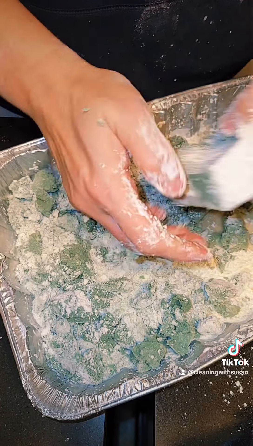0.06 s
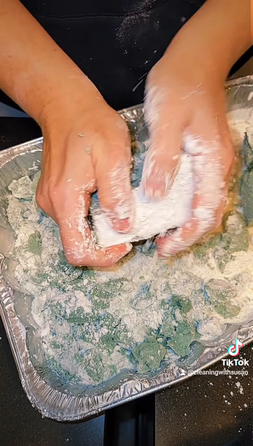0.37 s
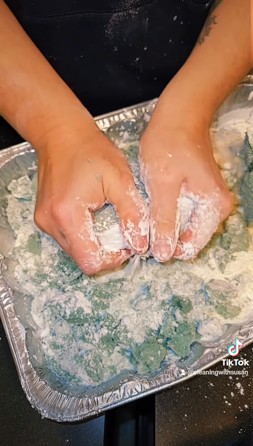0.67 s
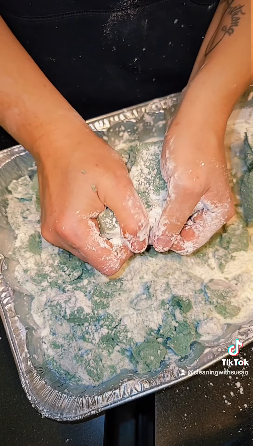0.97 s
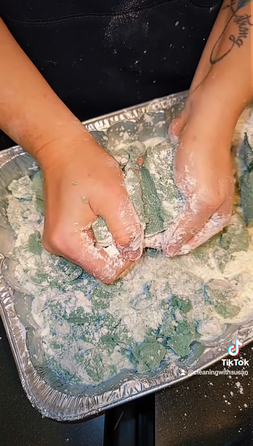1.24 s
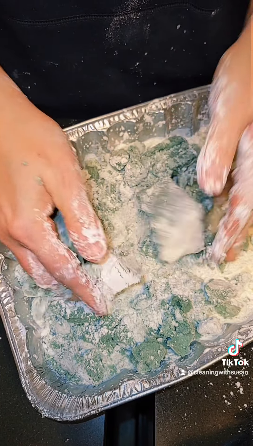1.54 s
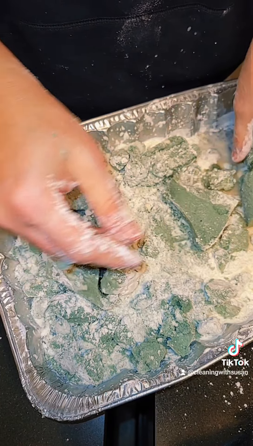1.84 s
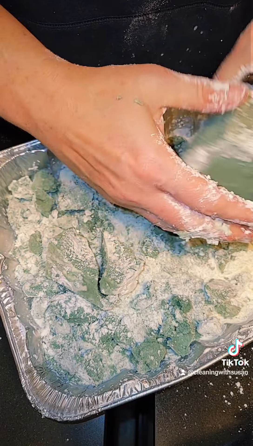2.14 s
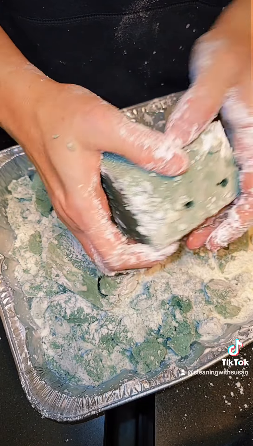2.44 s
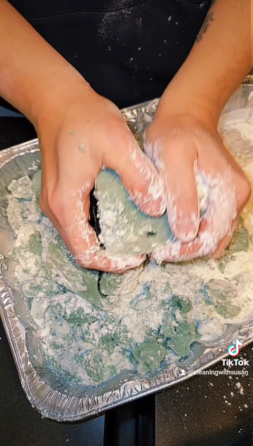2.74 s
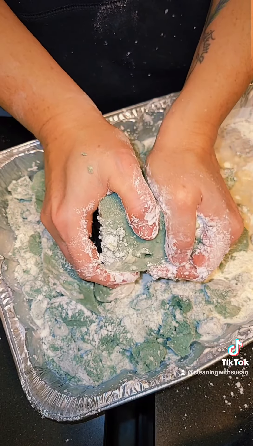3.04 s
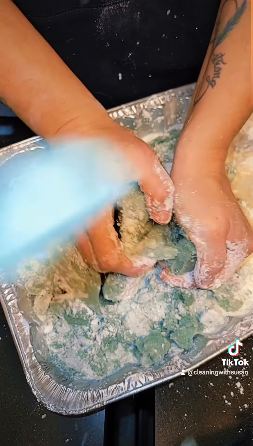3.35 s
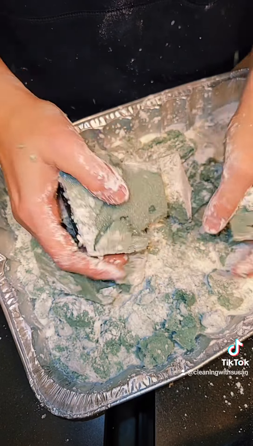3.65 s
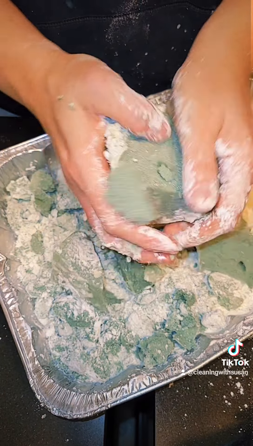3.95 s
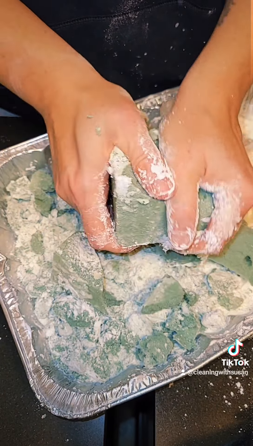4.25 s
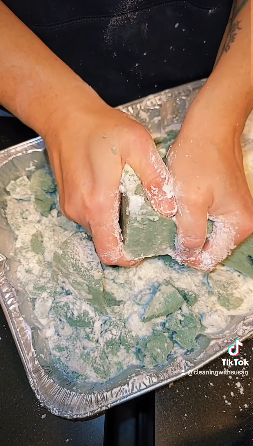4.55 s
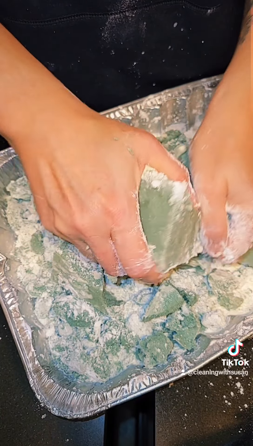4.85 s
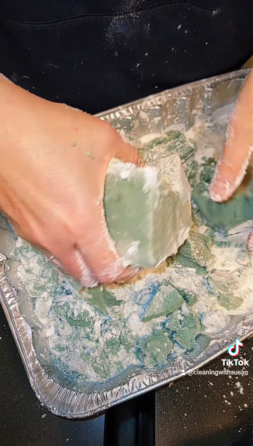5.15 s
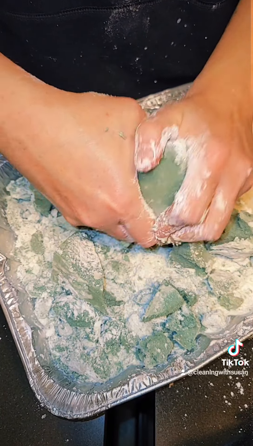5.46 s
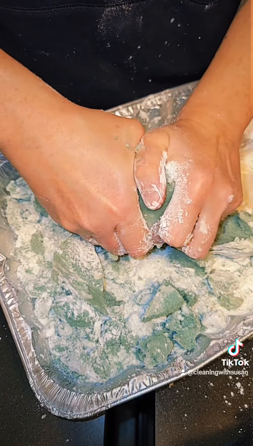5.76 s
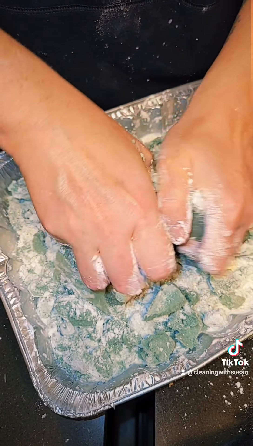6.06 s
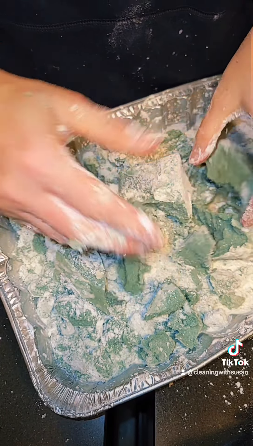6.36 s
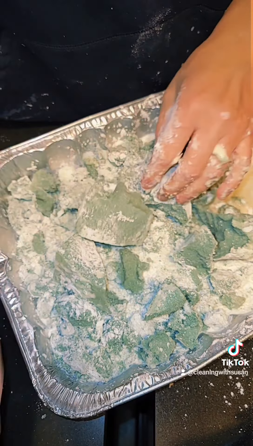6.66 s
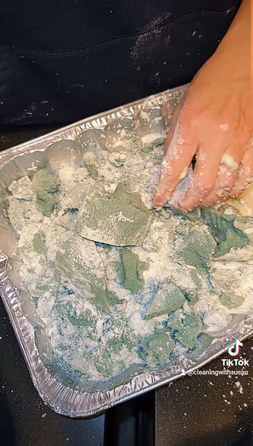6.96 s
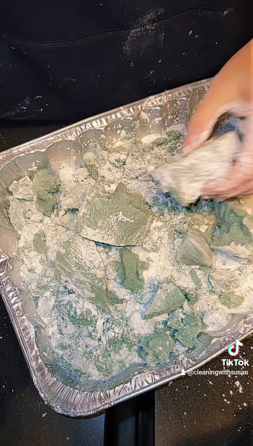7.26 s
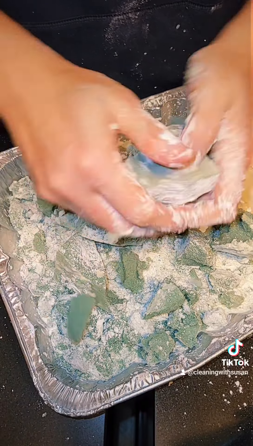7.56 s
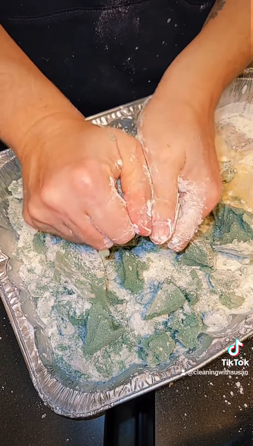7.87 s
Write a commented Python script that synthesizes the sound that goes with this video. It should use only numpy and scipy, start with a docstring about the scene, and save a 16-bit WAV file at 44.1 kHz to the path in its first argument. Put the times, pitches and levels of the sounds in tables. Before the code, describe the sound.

Fingers rub dry floral foam and bump a foil tray with a dull thud. Two hands then crush the blocks in a series of crisp, crackling squeezes, the foam juddering, snapping and collapsing while powder hisses between the fingers. Between squeezes there is softer rubbing, and crumbs tick on the foil. The microphone is close, in a small room with a faint low rumble.

```python
"""Fingers rub dry floral foam and bump a foil tray over the low rumble of a small room.
Two hands then crush the blocks, close by. Each squeeze collapses thousands of brittle cells:
the foam judders, snaps and breaks in an avalanche of fractures. Powder hisses between the fingers,
brief pitched resonances sound in the crunch, and crumbs tick on the foil."""
import sys
import numpy as np
from scipy import signal
from scipy.fft import rfft, irfft, next_fast_len
from scipy.io import wavfile
from scipy.ndimage import map_coordinates

SR = 44100
rng = np.random.default_rng(int(sys.argv[2]) if len(sys.argv) > 2 else 0)


def unload_wav(signal):
    """Save mono or channel-first audio to the path in sys.argv[1] as 16-bit WAV at rate SR, clipped to [-1, 1]."""
    wavfile.write(
        sys.argv[1],
        SR,
        np.round(np.clip(np.atleast_2d(signal).T, -1, 1) * 32767).astype(np.int16),
    )


N = 353682

# Blocks or lumps giving way: start_s, level_db, rise_s, t60_s, powder_share
BLOCK_BREAKS = [(0.611, -3, 0.003, 0.46, 0.3), (1.154, -1.5, 0.0005, 0.32, 0.2),
                (1.279, -17.5, 0.00053, 0.25, 1), (3.188, 7.5, 0.011, 0.31, 0),
                (4.634, 4, 0.00093, 0.39, 0.12), (5.896, 0.5, 0.00049, 0.28, 0.01),
                (6.357, -12, 0.003, 0.16, 0.78), (6.435, -27, 0.003, 0.43, 0.6),
                (6.897, -10.5, 0.0017, 0.43, 1), (7.912, 2.5, 0.0036, 0.31, 0)]
# Crust cracks: start_s, level_db, pitch_hz
CRUST_SNAPS = [(0.7227, -1, 4580), (0.7293, -4.5, 7770), (3.046, -2.5, 2800), (3.1053, -8, 7900),
               (3.161, 1.5, 7450), (4.2341, -9, 3460), (4.4782, -6, 4650), (4.495, 1, 4780),
               (4.5013, -1.5, 3630), (4.5094, 0.5, 5890), (4.5382, -2, 5850), (4.559, -1, 4500),
               (4.6064, -6.5, 3270), (5.4446, -6, 8220), (5.4646, -3.5, 4320), (5.5452, 3, 7350),
               (5.708, -3.5, 6130), (5.773, -2, 4970), (5.806, -3.5, 7400), (5.8732, -1.5, 3370),
               (7.785, 1, 7430)]
# Fine powder: freq_hz, gain_db
POWDER_SPECTRUM = [(800, -28.5), (2700, -34), (4200, -10.5), (6000, -5.5), (7700, -1), (9500, -5),
                   (11000, -2), (12700, 1), (15500, -2)]
# Hands over the tray: time_s, position (0 middle, 1 right edge)
HAND_PATH = [(0, 0.72), (.4, 0.051), (6.2, 0), (6.6, 0.85), (7.3, 1), (7.65, 0)]


def amp(db):
    """Decibels to gain."""
    return 10 ** (np.asarray(db) / 20)


def unit(x):
    """Scale to rms 1."""
    return x / np.sqrt(np.mean(x ** 2) + 1e-20)


def pan(left_over_right_db):
    """Left and right gains."""
    return amp(np.array([[1], [-1]]) * left_over_right_db / 2)


def along(points, hz):
    """Interpolate (freq_hz, value) rows on a log axis."""
    freq_hz, values = np.transpose(points)
    return np.interp(np.log(hz + 1), np.log(freq_hz + 1), values)


def curve(points):
    """Interpolate (time_s, value) rows per sample."""
    return np.interp(np.arange(N) / SR, *np.transpose(points))


def wobble(rate_hz):
    """Smooth random curve."""
    knots = rng.standard_normal(int(N * rate_hz / SR) + 4)
    return map_coordinates(knots, [np.arange(N) * rate_hz / SR], order=2)


def filtered(x, response):
    """Apply response(hz) by FFT."""
    size = next_fast_len(x.shape[-1] + SR // 8)
    return irfft(rfft(x, size) * response(np.fft.rfftfreq(size, 1 / SR)), size)[..., :x.shape[-1]]


def colour(x, spectrum, size=4096):
    """Minimum-phase filter; attacks stay sharp."""
    cepstrum = irfft(np.log(amp(along(spectrum, np.fft.rfftfreq(size, 1 / SR)))))
    cepstrum[1:size // 2] *= 2
    cepstrum[size // 2 + 1:] = 0
    impulse = irfft(np.exp(rfft(cepstrum)))
    return signal.fftconvolve(x, impulse[None] / np.linalg.norm(impulse), axes=1)[:, :x.shape[1]]


def resonance(x, hz, q):
    """One damped mode."""
    return filtered(x, lambda f: 1j * f * hz / q / (hz * hz - f * f + 1j * f * hz / q))


def noise(size=N):
    """White stereo noise, alike in the bass only."""
    # Left-right likeness: freq_hz, correlation
    likeness = [(30, 0.67), (60, 0.81), (130, 1), (290, 0.8), (640, 0), (1400, 0.07), (4000, 0), (12000, 0)]

    def mid_side_gains(hz):
        angle_rad = np.arccos(np.clip(along(likeness, hz), -1, 1)) / 2
        return np.array([np.cos(angle_rad), np.sin(angle_rad)])

    mid, side = filtered(rng.standard_normal((2, size)), mid_side_gains)
    return np.array([mid + side, mid - side])


def add(track, start_s, sound):
    """Mix in place."""
    part = track[:, max(round(start_s * SR), 0):][:, :sound.shape[1]]
    part += sound[:, :part.shape[1]]


def grains(rate_hz, spread_db, clump_db):
    """Tiny uneven fractures in clumps; position sets each one's left-right delay."""
    fires = rng.random(N) < rate_hz / SR
    size_db = spread_db * np.clip(rng.standard_normal(N), -2, 2) + clump_db * wobble(260)
    left = fires * amp(size_db) * rng.choice([-1, 1], N)
    delay_samples = np.round(3 - 23 * curve(HAND_PATH) + 8 * rng.laplace(size=N)).astype(int)
    right = np.bincount(np.clip(np.arange(N) + delay_samples, 0, N - 1), left, N)
    return np.array([left, right])


def hollows(x, depth_db, width_hz, life_s):
    """Shifting gaps between fingers and foam resonate: random spectral peaks and dips."""
    spectra = signal.stft(x, nperseg=1024)[2]
    bins, frames = np.indices(spectra.shape[1:])
    knots = rng.standard_normal((512, 700))
    grid = [bins * SR / 1024 / width_hz, frames * 512 / SR / life_s]
    gain_db = depth_db * map_coordinates(knots, grid, order=1, mode="mirror")
    return unit(signal.istft(spectra * amp(gain_db), nperseg=1024)[1][:, :N])


def background():
    """Low rumble and soft room air swell and sink together."""
    # Rumble envelope: time_s, level_db
    swell = [(0.0, -27), (0.06, -39), (0.11, -36), (0.29, -39.5), (0.64, -36.5), (0.67, -42), (1.83, -42),
             (2.48, -31.5), (3.06, -31), (3.24, -41), (4.38, -38), (4.49, -31.5), (4.53, -47),
             (5.52, -35.5), (5.58, -46), (7.75, -30.5), (7.95, -44), (8.02, -34.5)]
    # Room rumble: freq_hz, gain_db
    rumble_spectrum = [(20, -24.5), (32, -12.5), (48, 1.5), (70, 0.5), (90, -3.5), (117, 2), (150, -5.5),
                       (210, -10), (290, -20), (420, -29.5), (900, -44)]
    # Room air: freq_hz, gain_db
    air_spectrum = [(100, -8), (350, -6), (550, 0.5), (800, 1.5), (1200, -9.5), (2500, -35), (5000, -14.5),
                    (15500, -36)]
    rumble = unit(colour(noise(), rumble_spectrum))
    air = unit(colour(noise(), air_spectrum))
    return amp(curve(swell)) * (rumble + amp(-14) * air)


def stroke(full_s, hold_s, rise_db_per_s, fall_db_per_s):
    """Gain of one hand movement: build up, hold, die away."""
    t = np.arange(N) / SR - full_s
    gain_db = rise_db_per_s * np.minimum(t, 0) - fall_db_per_s * np.maximum(t - hold_s, 0)
    return amp(np.maximum(gain_db, -120))


def handling(trickle_db=-59):
    """Gains of cells, powder and tearing: hand movements summed in power over a steady trickle."""
    # Fingers rub or turn a piece: full_s, hold_s, level_db, tearing_offset_db
    rubs = [(0.0, 0.16, -49.5, 1.5), (0.254, 0.12, -42, -1.5), (0.41, 0.22, -45.5, 3.5),
            (1.321, 0.015, -34, -12), (1.412, 0.03, -40, -16), (1.522, 0.051, -51.5, -13),
            (1.902, 0.11, -64, 10), (1.968, 0.16, -58, -0.5), (2.27, 0.058, -53, -6),
            (2.333, 0.035, -41.5, -6.5), (2.4, 0.18, -45.5, -6), (2.465, 0.038, -35.5, -2),
            (3.42, 0.063, -34.5, -8.5), (3.553, 0.29, -50, -8), (3.683, 0.023, -53, 9),
            (3.968, 0.028, -47, -8), (4.041, 0.058, -44, -4.5), (4.947, 0.12, -46.5, -8),
            (5.13, 0.17, -47.5, -10), (5.3, 0.075, -41.5, -27), (5.98, 0.046, -43.5, -2),
            (6.091, 0.082, -34, -14), (6.239, 0.053, -49.5, -19), (6.444, 0.012, -44.5, -3.5),
            (6.82, 0.07, -54.5, -10), (7.33, 0.17, -58.5, 0.5), (7.61, 0.006, -40, -4.5)]
    # Hands bear down: full_s, hold_s, rise_db_per_s, level_db, powder_offset_db, tearing_offset_db
    squeezes = [(0.62, 0.2, 113, -26.5, -1, -26), (0.954, 0.23, 66, -33, 5, -14),
                (2.777, 0.064, 114, -24.5, 3, -13), (2.893, 0.38, 143, -25.5, 1.5, -10),
                (4.234, 0.12, 280, -28, -2.5, -11), (4.387, 0.041, 172, -26.5, 0, -10),
                (4.495, 0.21, 199, -27.5, -0.5, -13), (4.797, 0.067, 145, -25.5, -1, -11.5),
                (5.45, 0.2, 229, -26.5, -1, -14.5), (5.754, 0.17, 139, -26, -3.5, -21.5),
                (6.915, 0.1, 900, -36.5, 9.5, -9.5), (7.047, 0.13, 380, -29.5, 7.5, -15),
                (7.761, 0.046, 163, -25, -4, -17), (7.883, 0.065, 220, -27.5, 5, -11.5)]
    # Thumbs tear in: full_s, hold_s, rise_db_per_s, level_db
    tears = [(0.637, 0.06, 150.5, -38.5), (2.664, 0.016, 380, -22), (3.226, 0.12, 302, -33),
             (4.162, 0.051, 1100, -27), (4.624, 0.022, 900, -30), (5.558, 0.11, 90, -37.5)]
    cells, powder, tearing = np.zeros(N), np.full(N, amp(trickle_db) ** 2), np.zeros(N)
    for *timing, level_db, tearing_db in rubs:
        rub = amp(level_db) * stroke(*timing, rise_db_per_s=454, fall_db_per_s=257)
        cells += rub ** 2
        powder += (amp(0.5) * rub) ** 2
        tearing += (amp(tearing_db) * rub) ** 2
    for *timing, level_db, powder_db, tearing_db in squeezes:
        press = amp(level_db) * stroke(*timing, fall_db_per_s=158)
        cells += press ** 2
        powder += (amp(level_db + powder_db) * stroke(*timing, fall_db_per_s=226)) ** 2
        tearing += (amp(tearing_db) * press) ** 2
    for *timing, level_db in tears:
        tear = amp(level_db) * stroke(*timing, fall_db_per_s=281)
        cells += (amp(-2) * tear) ** 2
        tearing += tear ** 2
    return np.sqrt([cells, powder, tearing])


def stalls():
    """Gain dips: the foam holds still for 25 ms before it cracks, slips or suddenly gives way."""
    gain_db = np.zeros((1, N))
    dip = np.linspace(0, 1, SR // 40)[None] ** 0.5
    lead_s = dip.size / SR
    for start_s, _, rise_s, *_ in BLOCK_BREAKS:
        add(gain_db, start_s - lead_s, -6 * dip * np.exp(-rise_s / 0.0044))
    for start_s, *_ in [*CRUST_SNAPS, *jerks()]:
        add(gain_db, start_s - lead_s, -2.2 * dip)
    return amp(gain_db)


def crunch():
    """Cells collapse, powder slides and coarser pieces tear as the foam yields unevenly."""
    # Collapsing cells: freq_hz, gain_db
    cell_spectrum = [(200, -24.5), (700, -24.5), (1400, -11), (2100, -5), (3200, 0), (4600, 0.5),
                     (6000, -3), (7600, -3), (9500, -10.5), (15500, -16.5)]
    # Coarse tearing: freq_hz, gain_db
    tear_spectrum = [(120, -26), (300, -9.5), (500, -8.5), (680, -1.5), (830, -5.5), (980, -2),
                     (1200, -5.5), (1700, -4), (2300, -7.5), (4000, -20), (10000, -46.5)]
    cell_gain, powder_gain, tearing_gain = handling()
    cells = colour(grains(rate_hz=8000, spread_db=5, clump_db=1), cell_spectrum)
    cells = cell_gain * hollows(cells, depth_db=3, width_hz=215.7, life_s=0.07)
    powder = colour(grains(rate_hz=14000, spread_db=6, clump_db=1.2), POWDER_SPECTRUM)
    powder = powder_gain * hollows(powder, depth_db=3, width_hz=350, life_s=0.08)
    tearing = colour(grains(rate_hz=2500, spread_db=5, clump_db=2), tear_spectrum)
    tearing = tearing_gain * hollows(tearing, depth_db=4.5, width_hz=119.6, life_s=0.08)
    grip_db = 1.2 * wobble(45)
    return (amp(2.5) * cells + amp(5) * powder + amp(1.5) * tearing) * amp(grip_db) * stalls()


def bumps(t60_s=0.22):
    """The powder-filled tray answers a hand with a dull thud."""
    # Hand on tray: start_s, level_db, left_over_right_db
    knocks = [(0.009, -20, -16.5), (0.087, -11, -6.5), (0.111, -16.5, -11), (6.445, -20.5, 4),
              (7.608, -23, 10)]
    # Tray body: freq_hz, gain_db
    tray_spectrum = [(20, -9.5), (35, -3.5), (55, 4), (110, -0.5), (200, -15), (330, -18.5), (600, -31),
                     (2000, -46.5)]
    out, t = np.zeros((2, N)), np.arange(SR // 3) / SR
    for start_s, level_db, pan_db in knocks:
        thud = colour(noise(len(t)) * amp(-60 * t / t60_s), tray_spectrum)
        add(out, start_s, amp(level_db - 2.5) * pan(pan_db) * thud / np.abs(thud).max())
    return out


def specks():
    """Stray specks keep dropping from the fingers."""
    return amp(-61) * unit(colour(grains(rate_hz=16, spread_db=3, clump_db=1), POWDER_SPECTRUM))


def breaks(rush_t60_s=0.042):
    """A first rush of fractures, then a dying avalanche; caked powder sounds finer."""
    # Coarse avalanche: freq_hz, gain_db
    avalanche_spectrum = [(100, -18), (400, -11), (900, -14.5), (1500, -3), (2200, -0.5), (3500, 4),
                          (5000, 1), (7500, -0.5), (9500, -8.5), (13000, -2.5), (15500, -2.5)]
    out, t = np.zeros((2, N)), np.arange(SR // 2) / SR
    coarse = colour(grains(rate_hz=9000, spread_db=8, clump_db=3.5), avalanche_spectrum)
    coarse = hollows(coarse, depth_db=4, width_hz=180, life_s=0.1)
    fine = unit(colour(grains(rate_hz=24000, spread_db=1, clump_db=8), POWDER_SPECTRUM))
    for start_s, level_db, rise_s, t60_s, powder_share in BLOCK_BREAKS:
        decay = 1.63 * amp(-60 * t / rush_t60_s) + amp(-60 * t / t60_s)
        envelope = decay * (1 - np.exp(-t / rise_s))
        span = slice(round(start_s * SR), round(start_s * SR) + len(t))
        debris = np.sqrt(1 - powder_share) * coarse[:, span] + np.sqrt(powder_share) * fine[:, span]
        add(out, start_s, amp(level_db - 13) * envelope[:debris.shape[1]] * debris)
    return out


def jerks(judder_s=2.7905, first_gap_s=0.0403, gap_ratio=1.034, growth_db=0.7, pitch_hz=1850):
    """Rows of single slips, plus a judder of six that slows and strengthens."""
    # Block slips under the thumbs: start_s, level_db, pitch_hz
    single_slips = [(0.612, -7.5, 1740), (0.722, -16, 2630), (2.69, -8, 1980), (2.758, -9, 1230),
                    (3.077, -6.5, 1950), (5.67, -10.5, 2860), (5.894, -11, 2800)]
    gaps_s = first_gap_s * gap_ratio ** np.arange(6)
    starts_s = judder_s + np.cumsum(gaps_s) - gaps_s
    judder = [(start_s, -14 + growth_db * k, pitch_hz) for k, start_s in enumerate(starts_s)]
    return [*single_slips, *judder]


def slips(puff_t60_s=0.02):
    """Each jerk is a push and a puff that ring the block and the air cupped around it."""
    out, t = np.zeros((2, N)), np.arange(SR // 12) / SR
    for start_s, level_db, pitch_hz in jerks():
        push = 3 * np.exp(-t / 0.0001) + noise(len(t)) * amp(-60 * t / puff_t60_s)
        block = unit(resonance(resonance(push, pitch_hz, q=0.99), pitch_hz, q=0.59))
        cupped = unit(resonance(resonance(push, hz=900, q=0.39), hz=895, q=0.65))
        add(out, start_s + 0.0015, amp(level_db - 20) * unit(block + 0.4 * cupped))
    return out


def crunch_resonances():
    """Brief pitched resonances in the crunch: hollow rings, a low knock and the body of breaks."""
    # Brief resonances: centre_s, length_s, pitch_hz, level_db
    rings = [(0.66, 0.098, 1680, -31.5), (2.668, 0.059, 612, -29.5), (2.677, 0.039, 350, -33),
             (3.16, 0.031, 170, -33.5), (3.321, 0.072, 1620, -27.5), (4.219, 0.11, 3130, -24),
             (4.507, 0.1, 487, -37), (5.628, 0.05, 680, -36), (5.696, 0.097, 2840, -26.5),
             (5.919, 0.031, 295, -35), (7.922, 0.19, 1950, -29)]
    out, t = np.zeros((2, N)), np.arange(-SR // 5, SR // 5) / SR
    for centre_s, length_s, pitch_hz, level_db in rings:
        ring = unit(resonance(resonance(noise(len(t)), pitch_hz, q=10), pitch_hz, q=2))
        add(out, centre_s + t[0], amp(level_db) * ring * np.exp(-(2 * t / length_s) ** 2))
    return out


def snaps(rise_s=0.00034, t60_s=0.021):
    """A bright crack runs through the crust in milliseconds."""
    out, t = np.zeros((2, N)), np.arange(SR // 12) / SR
    envelope = amp(-60 * t / t60_s) * (1 - np.exp(-t / rise_s))
    for start_s, level_db, pitch_hz in CRUST_SNAPS:
        burst = noise(len(t))
        crack = unit(resonance(burst, pitch_hz, q=1) + 0.24 * burst)
        add(out, start_s, amp(level_db - 7.5) * crack * envelope)
    return out


def crumbs(tick_t60_s=0.0069, dust_t60_s=0.028):
    """Light pieces tick on the foil, which barely rings; dust scatters after them."""
    # Crumbs on foil: start_s, peak_db, left_over_right_db
    landings = [(1.281, -17, -6), (2.051, -27, 0), (2.236, -26, -3), (3.6783, -2, -5), (3.755, -13.5, -8.0),
                (3.813, -14.5, -9), (3.8604, -19, -4), (6.7161, -29, -3), (7.4175, -18.5, 5),
                (7.5093, -14.5, 1)]
    out, t = np.zeros((2, N)), np.arange(SR // 6) / SR
    envelope = amp(-60 * t / tick_t60_s) + 0.097 * amp(-60 * t / dust_t60_s)
    for start_s, peak_db, pan_db in landings:
        touch = noise(len(t)) * envelope
        tick = resonance(touch, hz=8300, q=1.9) + resonance(touch, hz=12300, q=5.4)
        tick += 0.3 * resonance(touch, hz=3400, q=2.3)
        add(out, start_s, amp(peak_db) * pan(pan_db) * tick / np.abs(tick).max())
    return out


def room(x):
    """Short diffuse tail, 4 ms late; treble dies first."""
    # Room decay: freq_hz, t60_s
    decay = [(200, 0.4), (2000, 0.23), (8000, 0.11), (15000, 0.026)]
    hz, t, spectra = signal.stft(rng.standard_normal((2, SR // 3)), SR, nperseg=256)
    tail = signal.istft(spectra * amp(-60 * t / along(decay, hz)[:, None]), SR, nperseg=256)[1]
    impulse = np.pad(tail, ((0, 0), (SR // 250, 0))) / np.linalg.norm(tail[0])
    return signal.fftconvolve(x, impulse, axes=1)[:, :N]


def scene():
    """Close foam with a little room, plus tray thuds and background."""
    hands = (crunch() + breaks()) * pan(-1.6 * curve(HAND_PATH))
    foam = hands + crunch_resonances() + snaps() + slips() + crumbs() + specks()
    return foam + amp(-9.5) * room(foam) + bumps() + background()


def record(dry, cutoff_hz=15700):
    """Two microphone ports colour the sound differently; soft clip, then steep low-pass."""
    # Port imbalance: freq_hz, left_over_right_db
    imbalance = [(60, -0.5), (200, 1), (380, -4), (650, 6.5), (1290, 1.5), (2400, 2.5), (4400, .5),
                 (8100, 1), (14000, -2.5)]
    ports = filtered(dry, lambda hz: pan(along(imbalance, hz)))
    rounded = ports / (1 + ports ** 6) ** (1 / 6)
    return filtered(rounded, lambda hz: 1 / np.sqrt(1 + (hz / cutoff_hz) ** 200))


dry = scene()
out = record(dry)
unload_wav(out)
```